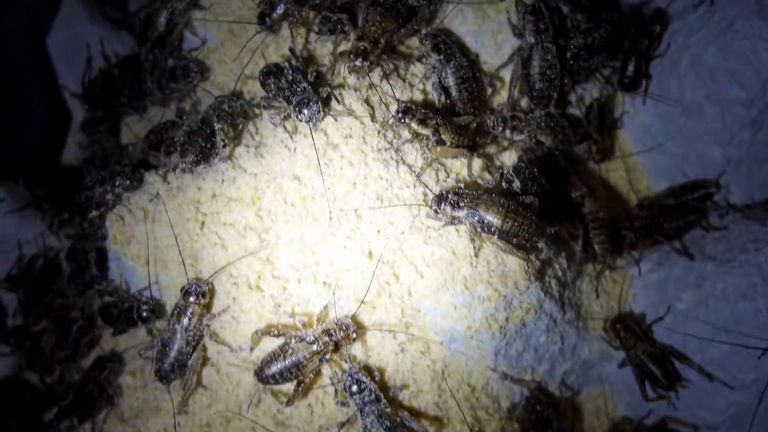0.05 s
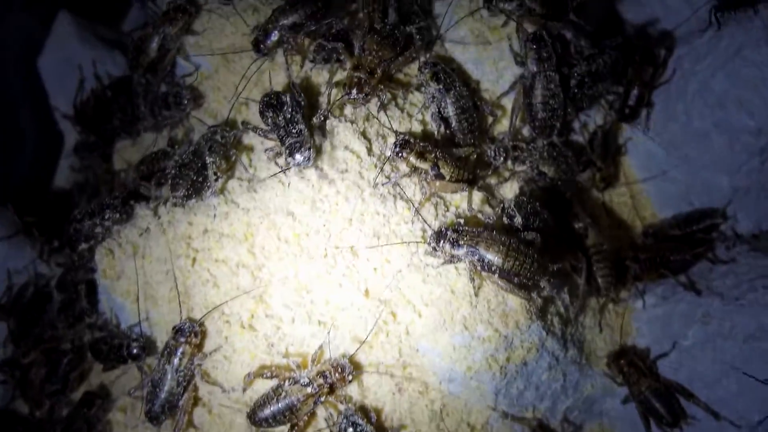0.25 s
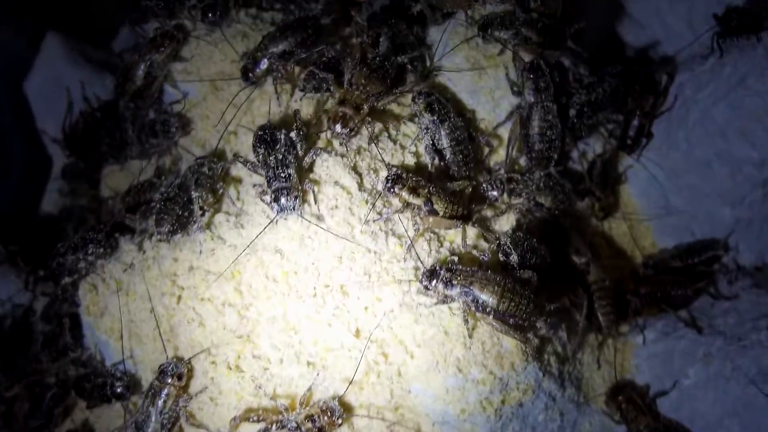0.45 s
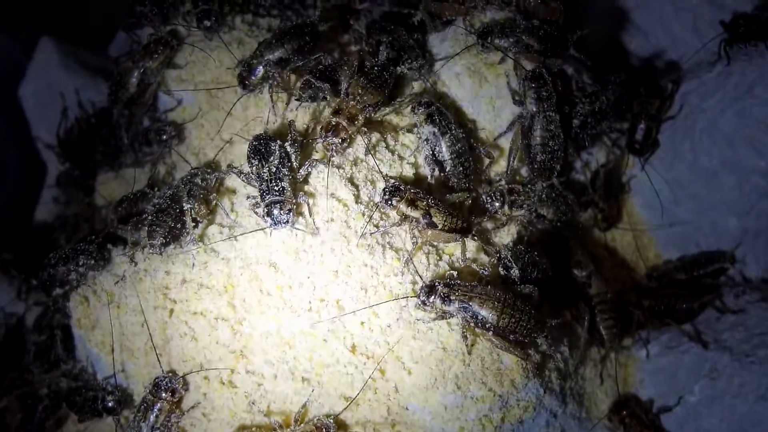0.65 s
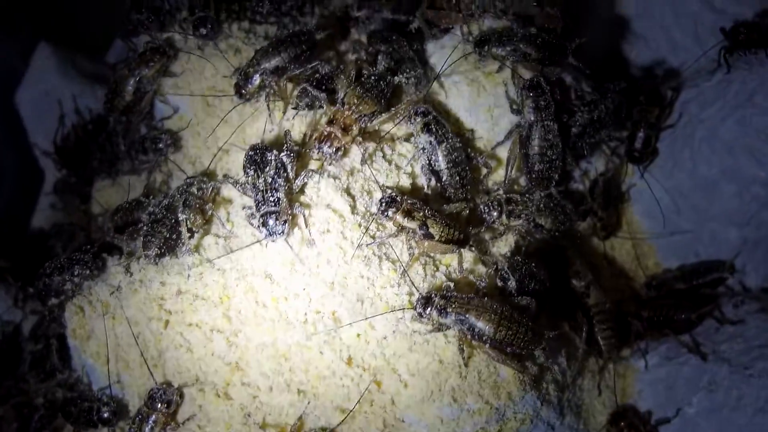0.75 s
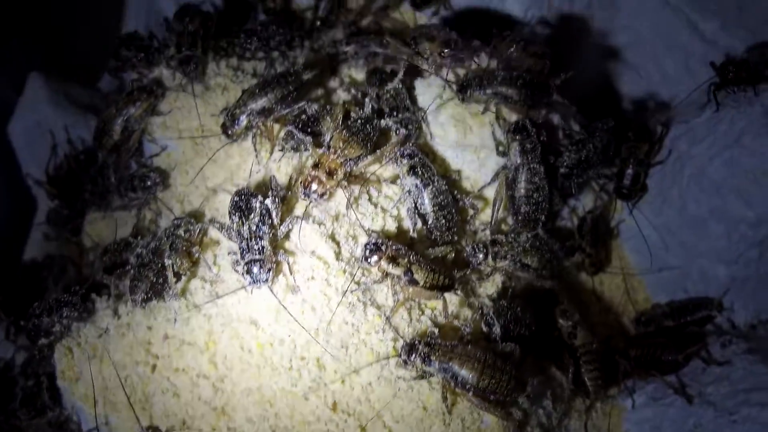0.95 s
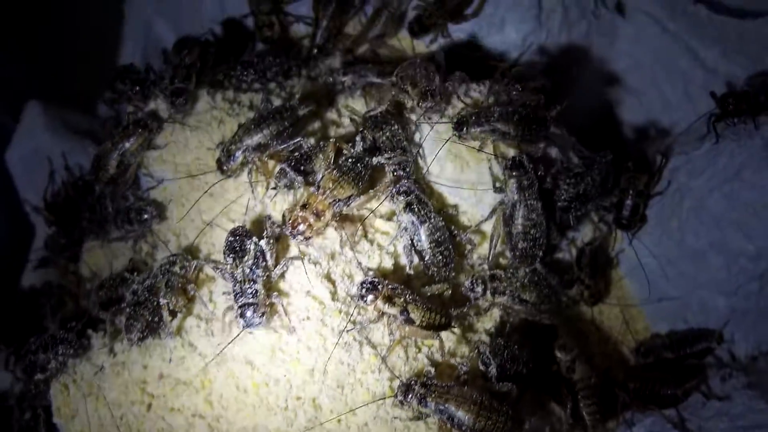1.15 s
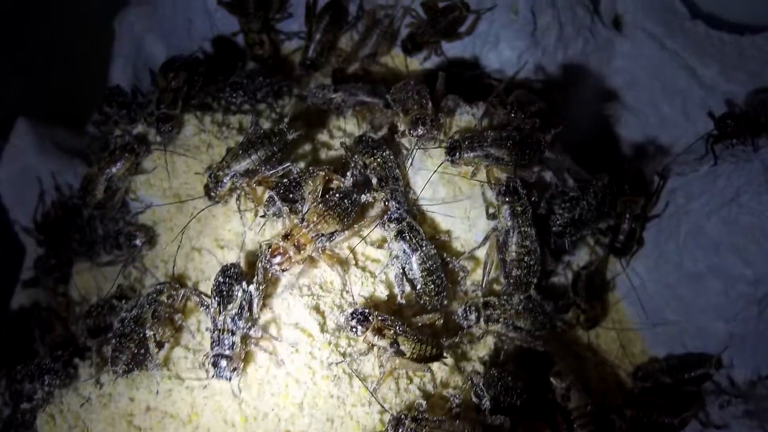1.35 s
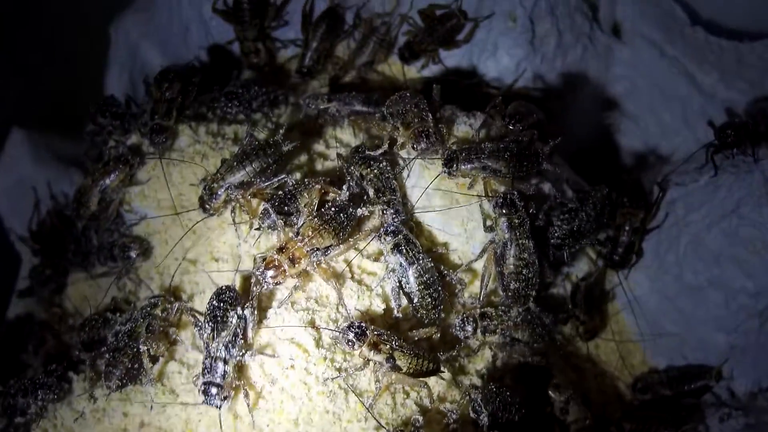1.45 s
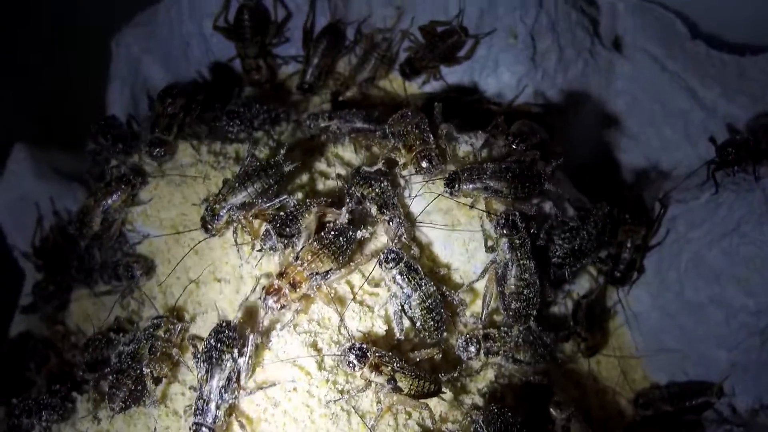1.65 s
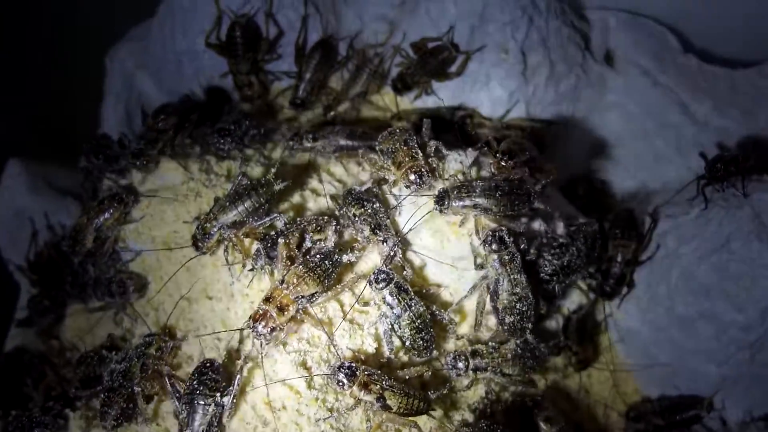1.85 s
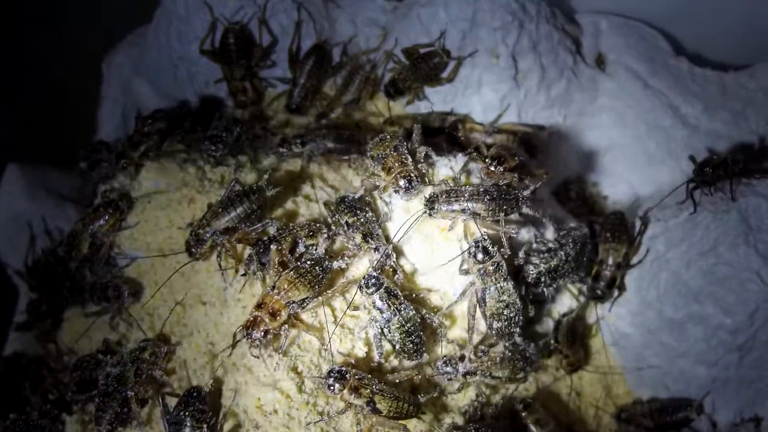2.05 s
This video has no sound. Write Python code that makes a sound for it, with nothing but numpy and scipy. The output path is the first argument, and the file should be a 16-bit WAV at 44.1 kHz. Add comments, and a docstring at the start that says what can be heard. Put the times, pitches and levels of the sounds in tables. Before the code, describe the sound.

Crickets crawl and feed in a plastic tub: fine crackling ticks and dull bites throughout, a hollow knock with quick bounces near the start, then small scuffs, close microphone, quiet humming room.

```python
"""A mains hum, room rumble and microphone hiss are heard first, as steady tones and coloured noise.
Over them crickets crawl and feed in a plastic tub indoors: claws and jaws tick and scratch as noise bursts.
Early on the tub is knocked and bounces: soft pushes set its ringing modes going, and scuffs follow.
One cricket chirps, very faintly, with short rough tones."""
import sys
import numpy as np
from scipy import signal
from scipy.fft import rfft, irfft
from scipy.io import wavfile
from scipy.ndimage import uniform_filter1d

SR = 44100
rng = np.random.default_rng(int(sys.argv[2]) if len(sys.argv) > 2 else 0)


def voltage_ratio(level):
    """Linear amplitude factor for a level in decibels (scalar or array-like)."""
    return 10 ** (np.asarray(level, float) / 20)


def dump_mix(stems):
    """Bounce the given channels to the path in sys.argv[1] as a 16-bit WAV at rate SR."""
    frames = np.atleast_2d(stems).T  # one column per channel
    limited = np.clip(frames, -1, 1)  # hard clip at full scale
    pcm = np.round(limited * 32767).astype(np.int16)
    wavfile.write(sys.argv[1], SR, pcm)


N = 92610
RISE_S = 0.0006  # how long clicks and wall pings take to swell


def noise():
    """White noise as long as the scene."""
    return rng.standard_normal(N)


def walk(rate):
    """A smooth random wander: levels held for 1 / rate seconds, then averaged twice."""
    hold = int(SR / rate)
    steps = np.repeat(rng.standard_normal(N // 200), hold)[:N]
    return 1.84 * uniform_filter1d(uniform_filter1d(steps, hold), hold)


def band(x, hz, width):
    """A simple resonance (two-pole band-pass) with gain 1 at its centre."""
    hz = np.clip(hz, 50, 0.42 * SR)
    width = np.clip(width, 20, 0.4 * SR)
    return signal.lfilter(*signal.iirpeak(hz, hz / width, fs=SR), x)


def add(out, at_s, x):
    """Mixes x into out from at_s on."""
    i = max(int(at_s * SR), 0)
    out[i:i + len(x)] += x[:max(N - i, 0)]


def fade(t, t60):
    """Dies away by 60 dB in t60 seconds."""
    return np.exp(-np.log(1000) * t / t60)


def ring(modes, gains):
    """A struck thing rings as a sum of sines, each dying away at its own pace."""
    t = np.arange(SR // 2) / SR
    out = np.zeros(len(t))
    for (hz, db, t60), gain in zip(modes, gains):
        loss_db = np.minimum(60 * t / max(t60, 0.005), 200)
        out += gain * voltage_ratio(db - loss_db) * np.sin(2 * np.pi * hz * t)
    return out


def clicks(rows, width):
    """Small contacts: a sharp edge and a noisy tail pass twice through a resonance (width: share of f)."""
    edge_s, tail_db = 0.00066, -4
    out, t = np.zeros(N), np.arange(2048) / SR
    rise = int(RISE_S * SR)
    for at, db, hz, t60 in rows:
        shape = np.exp(-t / edge_s) + voltage_ratio(tail_db) * fade(t, max(t60, 0.002))
        shape = uniform_filter1d(np.roll(shape, rise), rise + 1)  # soften the onset
        burst = rng.standard_normal(len(t)) * shape
        x = band(band(burst, hz, width * hz), hz, width * hz)
        add(out, at - RISE_S, voltage_ratio(db) * x / abs(x).max())
    return out


# room drone and mains hum: f/Hz, rms level/dB before the slow drift, waver/dB
HUM_LINES = [(79.3, -60.5, -0.5), (120.2, -45, 0.56), (240.7, -57, -0.5)]
# one thin, steady whine: f/Hz, rms level/dB before the slow drift
THIN_WHINE = (12228, -76)


def hum():
    """Low tones whose levels waver separately, and a steady high whine."""
    t = np.arange(N) / SR
    hz, db = THIN_WHINE
    out = np.sqrt(2) * voltage_ratio(db) * np.sin(2 * np.pi * hz * t)
    for hz, db, waver_db in HUM_LINES:
        level = np.sqrt(2) * voltage_ratio(db + waver_db * walk(6.27))
        out += level * np.sin(2 * np.pi * (hz * t + rng.random()))
    return out


# colour of room air and microphone hiss: f/Hz, relative level/dB
AIR_COLOUR = [(12, -67), (22, -36), (35, -4.5), (62, -9), (79, -1), (92, -23), (105, -2), (125, -9),
              (148, 1.5), (170, -2.5), (240, -3.5), (300, -7), (400, -14), (500, -13), (600, -8),
              (680, -13.5), (860, -20), (1640, -25), (3000, -28.5), (6500, -30.5), (12400, -30),
              (15100, -32), (20000, -54)]


def air():
    """Noise shaped to the colour of room and hiss; each octave flickers alone."""
    air_db, flicker_db = -48, 0.9  # overall rms before flicker and drift; typical flicker
    f = np.maximum(np.arange(N // 2 + 1) * SR / N, 1)
    colour_hz, colour_db = np.transpose(AIR_COLOUR)
    spec = rfft(noise()) * voltage_ratio(np.interp(np.log(f), np.log(colour_hz), colour_db))
    spec = spec * voltage_ratio(air_db) / np.std(irfft(spec, N))
    octave = np.clip(np.log2(f / 32), 0, 9)
    out = np.zeros(N)
    for k in range(10):
        share = np.maximum(1 - abs(octave - k), 0)  # neighbouring octaves overlap and sum to 1
        out += irfft(spec * share, N) * voltage_ratio(flicker_db * walk(12.47))
    return out


# slow drift of the background: t/s, level/dB
BACKGROUND_DRIFT = [(0, 0.5), (.5, 1.0), (1.1, 0.53), (1.6, 0.2), (2.1, -0.5)]
# brief dip in the lower background just before the main knock: start t/s, length/s, level/dB, below f/Hz
BACKGROUND_DIP = (.1965, .0075, -18, 3500)


def background():
    """Hum and air together drift slowly; their lower part dips once, briefly."""
    t = np.arange(N) / SR
    out = (air() + hum()) * voltage_ratio(np.interp(t, *np.transpose(BACKGROUND_DRIFT)))
    start, length, dip_db, below_hz = BACKGROUND_DIP
    shut = uniform_filter1d(1.0 * (t > start) * (t < start + length), size=60)
    low = signal.sosfiltfilt(signal.butter(2, below_hz, fs=SR, output="sos"), out)
    return out - low * shut * (1 - voltage_ratio(dip_db))


# crowd of small feet and jaws: ticks/per s, base level/dB, spread/dB, lowest f/Hz, highest f/Hz
SMALL_FEET = (101, -58, 2, 2009, 14000)


def crowd():
    """Random small ticks of all colours, few of them strong."""
    rate, db, spread_db, lo_hz, hi_hz = SMALL_FEET
    u = rng.random((int(rate * N / SR), 3))
    at = u[:, 0] * N / SR
    level = db - spread_db * np.log(u[:, 1] + 0.02)
    hz = lo_hz * (hi_hz / lo_hz) ** u[:, 2]
    tail_s = np.full(len(u), 0.015)
    return clicks(np.c_[at, level, hz, tail_s], 0.35)


# short modes of the thin wall: f/Hz, level/dB, t60/s
WALL_MODES = [(2410, 2, 0.031), (4840, -0.5, .022), (7100, -8.5, 0.012), (9450, -2, 0.016),
              (11800, 10, .012)]


def pings(rows):
    """Bites ring the wall's modes, slightly detuned; modes near the bite's own pitch answer most."""
    db_per_octave, scatter_db, detune = -6, 3.5, 0.036  # detune as a share of f
    out = np.zeros(N)
    for at, _, bite_hz, _, ping_db in rows:
        u = rng.standard_normal(len(WALL_MODES))
        modes = []
        for (hz, db, t60), v in zip(WALL_MODES, u):
            octaves_away = abs(np.log2(hz / bite_hz))
            modes.append((hz * (1 + detune * v), db + db_per_octave * octaves_away, t60))
        x = ring(modes, voltage_ratio(-scatter_db * u[::-1]))
        swell = np.minimum(np.arange(len(x)) / (RISE_S * SR), 1)
        add(out, at, voltage_ratio(ping_db) * x * swell)
    return out


# duller bites and scrapes: t/s, peak level/dB, centre f/Hz, tail t60/s, wall ping level/dB
BITE_EVENTS = [(0.0757, -43.5, 3470, 0.03, -46), (0.1936, -43, 2410, 0.04, -70),
               (0.332, -43, 4270, 0.031, -55), (0.4404, -43.5, 6550, 0.048, -48),
               (0.452, -53, 5360, 0.04, -58), (0.5208, -46.5, 3800, 0.055, -53),
               (0.556, -37, 6400, 0.025, -42), (0.561, -36.5, 7340, 0.03, -46),
               (0.5638, -40, 5860, 0.035, -50), (0.7397, -44, 4520, 0.035, -55),
               (0.9707, -44, 4800, 0.027, -50), (1.1409, -36, 5600, 0.016, -53),
               (1.2341, -46, 3300, 0.033, -56), (1.265, -49, 3900, 0.046, -68),
               (1.385, -43, 5050, 0.07, -58), (1.501, -49, 2470, 0.033, -62),
               (1.563, -50, 2600, 0.037, -59), (1.8, -43, 4900, 0.035, -54.5),
               (1.915, -48, 2510, 0.03, -65), (1.9642, -40.5, 3100, 0.025, -56),
               (1.9685, -50, 6000, .02, -60), (2.0643, -39, 3570, 0.022, -60)]


def bites():
    """Jaws and scrapes give broad, dull clicks and make the wall ping."""
    return clicks(np.array(BITE_EVENTS)[:, :-1], 1.55) + pings(BITE_EVENTS)


# bright ticks of claws on plastic: t/s, peak level/dB, centre f/Hz, tail t60/s
CLAW_TICKS = [(0.131, -45, 11600, 0.02), (0.2467, -43, 9080, 0.018), (0.2614, -35, 13800, 0.02),
              (0.493, -35.5, 13900, 0.015), (0.6049, -38.5, 12200, 0.024), (0.7150, -35, 13500, 0.0099),
              (0.847, -34.5, 11700, 0.028), (0.8957, -40, 12900, 0.02), (0.933, -38.5, 13800, 0.022),
              (1.0075, -30.5, 13500, 0.021), (1.1345, -39, 12400, 0.015), (1.301, -38.5, 11700, 0.022),
              (1.3965, -41, 12200, 0.022), (1.268, -44.5, 10000, .04), (1.4425, -47, 8510, 0.02),
              (1.477, -44, 13500, .02), (1.8003, -43, 9700, 0.018), (1.5, -43, 12400, 0.02),
              (1.5503, -34, 12100, 0.037), (1.5892, -36.5, 12300, 0.028), (1.6022, -40, 10000, 0.016),
              (1.8376, -42.5, 9400, 0.017), (1.886, -45, 12300, 0.02), (2.0122, -32.5, 15600, 0.022),
              (2.0135, -46, 7500, 0.03), (.579, -46, 11300, .03)]


def ticks():
    """Hard claws on plastic give bright clicks."""
    return clicks(CLAW_TICKS, 0.6)


# ringing modes of the tub: f/Hz, level/dB, t60/s
TUB_MODES = [(145.8, -13.5, 0.29), (232.2, -7.5, 0.078), (319, -5, 0.061), (361, -10.5, 0.11),
             (444, -48, 0.025), (500, -10.5, 0.027), (750, -38, 0.049), (910, -18, 0.073),
             (1030, -13.5, 0.053), (1110, -7.5, 0.044), (1184, -9, 0.039), (1291, -16.5, 0.064),
             (1406, -16, .08), (1630, -39, 0.036), (1780, -20, .1), (2080, -28, 0.25), (2406, -14, 0.13),
             (2930, -39, .06)]
# the tub's hollow ring: f/Hz, level/dB, t60/s
HOLLOW_MODES = [(586, -7.5, 0.073), (630.5, 1, 0.084), (654.5, -6.5, .13)]
# blows and bounces on the tub: t/s, drive level/dB, contact/ms, hollow ring level/dB
TUB_BLOWS = [(.187, -37.5, 1.9, -13), (0.2048, -15, 0.66, -11.5), (.2152, -23, 0.51, 1.5),
             (.2183, -27, 0.67, 3.5), (.2277, -24.5, 0.78, 2), (.2355, -31, 0.62, -2),
             (.2495, -36, 1.04, -2.5), (.262, -30.5, 0.93, 0), (0.276, -32.5, 1.4, -2),
             (.286, -36.5, 1.84, -11), (.314, -38, 1.3, -6.5)]


def knocks():
    """Each blow is a soft push, then fading chatter, into the tub's modes; loose bits rattle on."""
    scatter_db, chatter_db, chatter_t60 = 4.5, -33.5, 0.16
    rattle_db, rattle_t60, rattle_hz = -38.5, 0.22, 1480
    out, t = np.zeros(N), np.arange(SR // 2) / SR
    signs = (-1) ** np.arange(len(TUB_MODES))
    for at, db, contact_ms, hollow_db in TUB_BLOWS:
        push = np.hanning(int(contact_ms * SR / 1000) + 3)
        gains = voltage_ratio(scatter_db * rng.uniform(-1.47, 1, len(TUB_MODES))) * signs
        body = ring(TUB_MODES, gains) + voltage_ratio(hollow_db) * ring(HOLLOW_MODES, [1, 1, 1])
        drive = voltage_ratio(chatter_db) * rng.standard_normal(len(t)) * fade(t, chatter_t60)
        drive[0] = 1  # the blow itself, ahead of the chatter
        pushed_body = np.convolve(body, push / push.sum())
        add(out, at, voltage_ratio(db) * signal.fftconvolve(pushed_body, drive))
    rattle = band(rng.standard_normal(len(t)), rattle_hz, 970)
    rattle = signal.sosfilt(signal.butter(4, 2.3 * rattle_hz, fs=SR, output="sos"), rattle)
    rattle = voltage_ratio(rattle_db) * rattle / np.std(rattle) * fade(t, rattle_t60)
    add(out, TUB_BLOWS[1][0], rattle)  # starts with the main knock
    return out


# narrow, ringing scuffs against the wall: t/s, peak level/dB, centre f/Hz, tail t60/s
WALL_SCUFFS = [(.3772, -48, 2800, .012), (.3775, -36, 1430, 0.0095), (.3788, -34.5, 835, 0.034),
               (.3855, -39.5, 665, 0.022), (.42, -43, 686, 0.016), (.455, -46, 785, 0.03),
               (.4645, -38.5, 392, 0.012), (.4655, -43, 820, 0.021), (1.266, -48, 3840, 0.054),
               (1.938, -54, 4500, .02), (2.064, -54.5, 2200, .015), (2.0645, -53, 3720, .015),
               (2.0655, -49, 5800, 0.014), (2.0678, -45, 940, 0.02)]


def scuffs():
    """Rubs against the wall pass through narrower resonances, so they ring more."""
    return clicks(WALL_SCUFFS, 0.5)


# faint chirps: start t/s, length/s, middle f/Hz, level/dB before swell and roughness
WING_CHIRPS = [(0.69, 0.027, 2600, -59), (1.172, 0.03, 2574, -56), (1.663, 0.022, 2630, -68)]


def chirps():
    """Short wing tones swell and fade, rise slightly in pitch and flutter roughly."""
    glide = 0.023  # share of the pitch it rises on each side of its middle
    out = np.zeros(N)
    for at, length, hz, db in WING_CHIRPS:
        t = np.arange(int(length * SR)) / SR
        swell = abs(np.sin(np.pi * t / length)) ** 0.99
        rough = 1 + 0.61 * np.sin(2 * np.pi * 130 * t)
        tone = np.sin(2 * np.pi * hz * t * (1 + glide * (t / length - 1)))
        add(out, at, np.sqrt(2) * voltage_ratio(db) * swell * rough * tone)
    return out


def scene():
    """Everything at one microphone."""
    return (background() + crowd() + bites() + ticks() + knocks() + scuffs() + chirps())[None]


def low_pass(x):
    """Removes everything above the highest recorded frequency."""
    return signal.sosfilt(signal.butter(12, 16530, fs=SR, output="sos"), x)


def record(dry):
    """The camera cuts the top above 15400 Hz steeply and the deep bass below 28 Hz gently."""
    no_top = signal.sosfilt(signal.ellip(8, 0.2, 30, 15400, fs=SR, output="sos"), dry)
    mix = signal.sosfilt(signal.butter(2, 28, "high", fs=SR, output="sos"), no_top)
    return low_pass(mix)


dry = scene()
out = record(dry)
dump_mix(out)
```